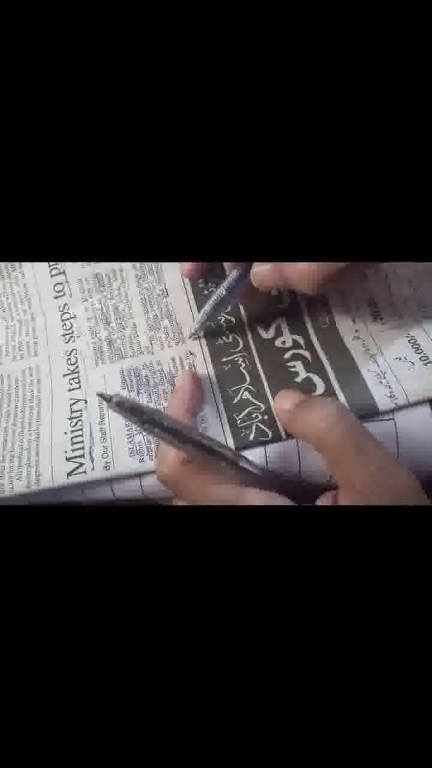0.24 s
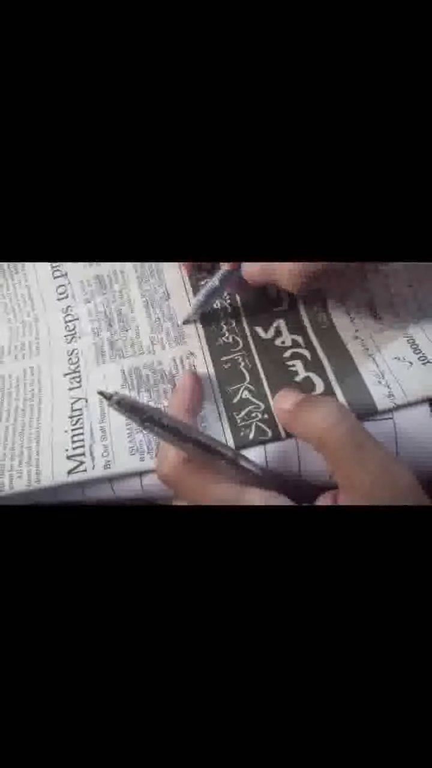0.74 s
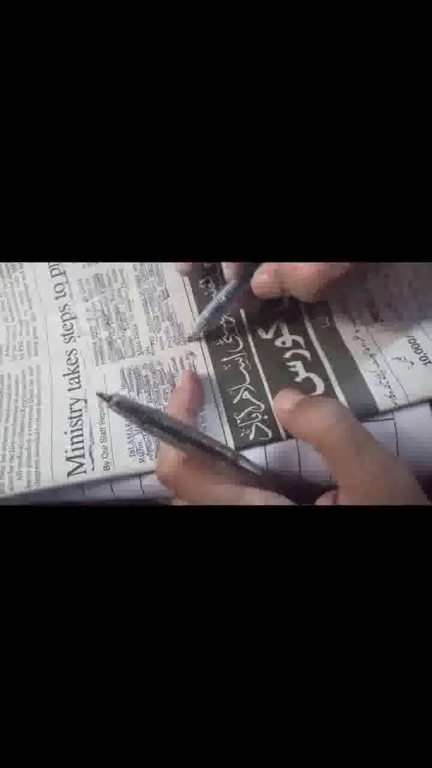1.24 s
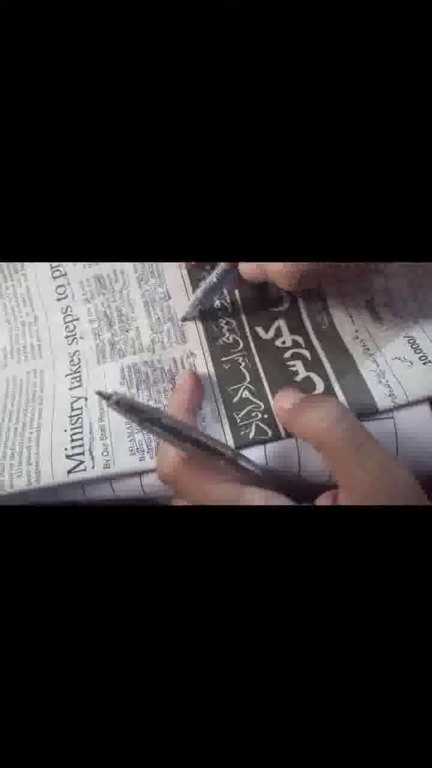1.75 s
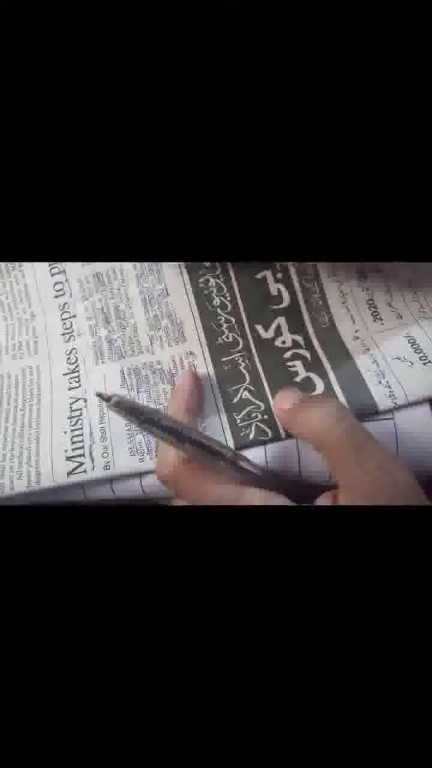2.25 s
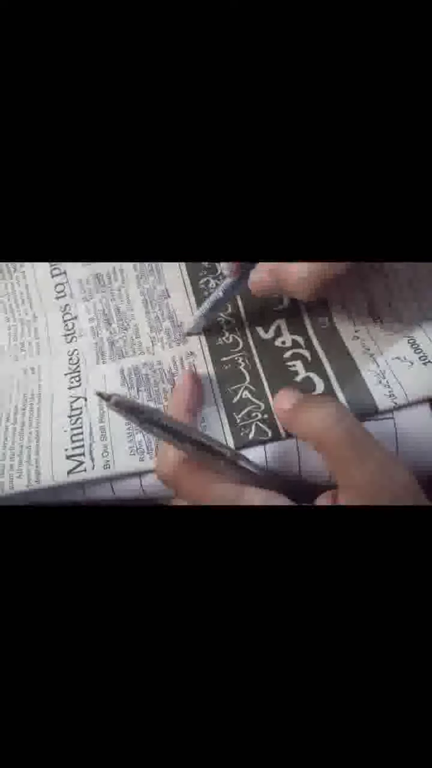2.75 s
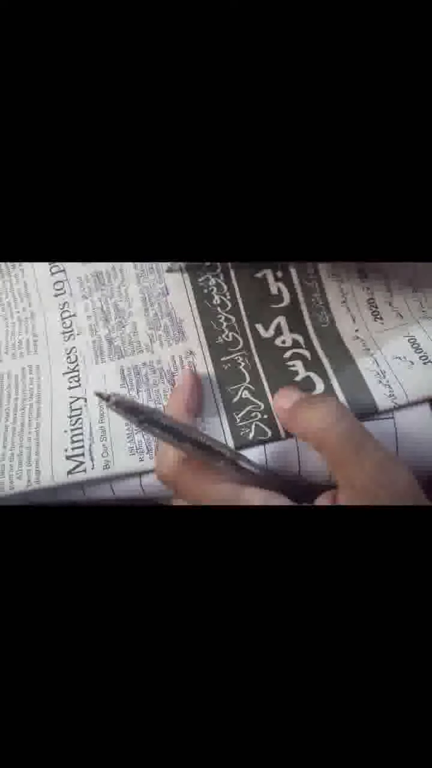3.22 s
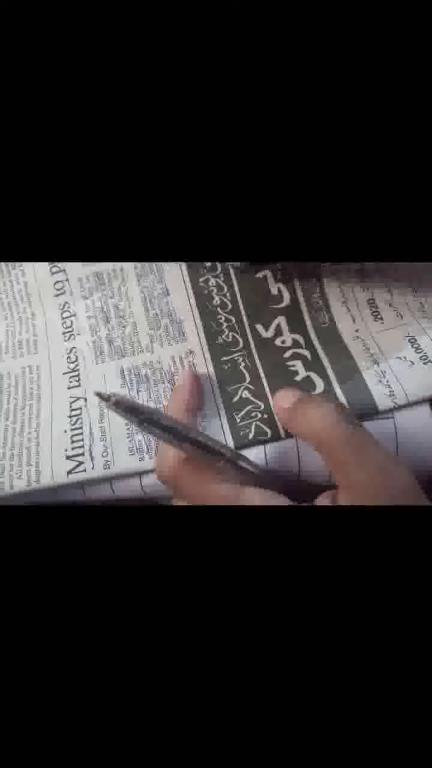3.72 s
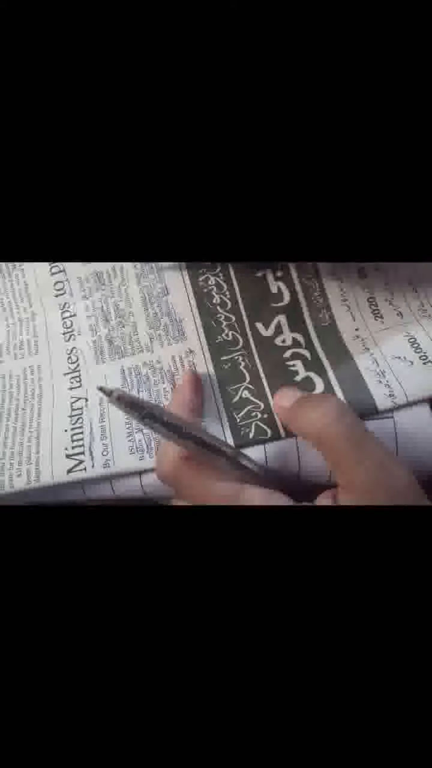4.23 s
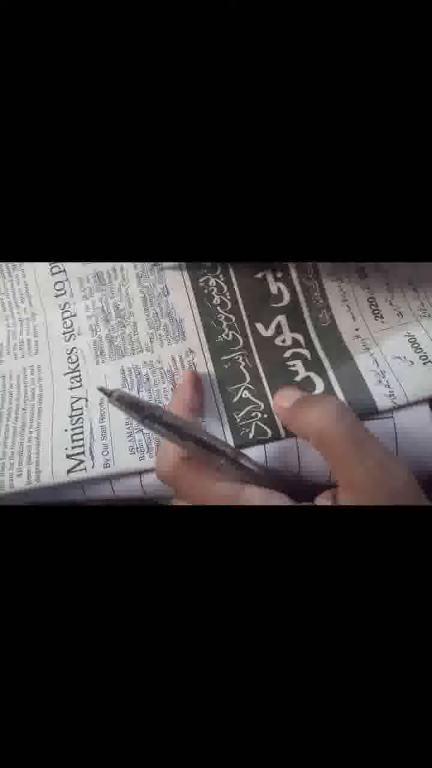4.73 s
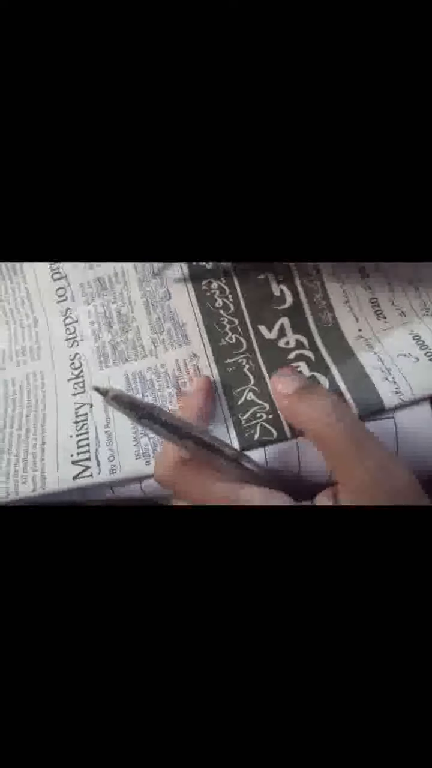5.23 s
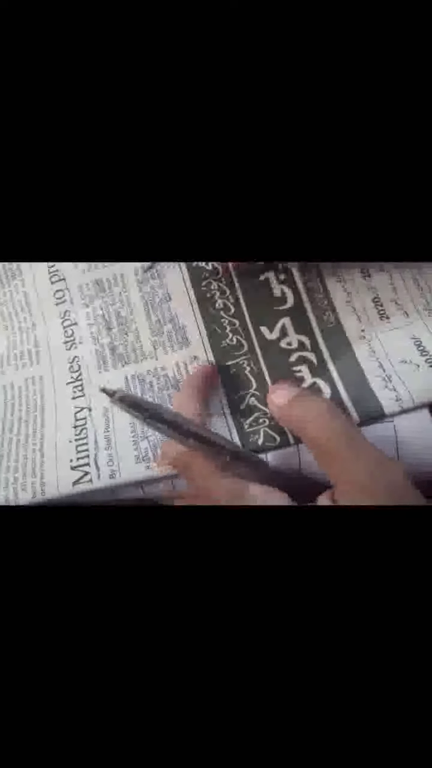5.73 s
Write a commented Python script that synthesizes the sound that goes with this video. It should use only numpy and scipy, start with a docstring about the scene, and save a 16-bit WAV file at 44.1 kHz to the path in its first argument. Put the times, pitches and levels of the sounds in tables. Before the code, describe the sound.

Close to a phone microphone, a flat hand sweeps loudly over newspaper resting on a notebook. Quiet, short pen strokes follow, with a few sharp clicking taps clustered midway. After a near lull, fingers rub the sheet with growing force until a crease pops brightly and the paper rustles loudly. The small quiet room adds only a faint reflection, with low desk rumble and soft hum.

```python
"""First a flat hand wipes broadly over newsprint; then a pen glides in short light strokes, with sharp taps.
Fingers rub the sheet ever more firmly until it crinkles and a crease pops, over a faint hum and rumble.
Strokes are random fibre slips shaped into hiss and flutter; taps are short blows ringing damped bands.
The newspaper lies on a notebook on a desk, close to a phone microphone in a quiet room."""
import sys
import numpy as np
from scipy import signal
from scipy.fft import rfft, irfft, next_fast_len
from scipy.io import wavfile
from scipy.ndimage import uniform_filter1d, minimum_filter1d, map_coordinates

SR = 44100
rng = np.random.default_rng(int(sys.argv[2]) if len(sys.argv) > 2 else 0)


def store_pcm(level_fs):
    """Save levels as 16-bit WAV."""
    pcm = np.round(np.clip(level_fs, -1, 1) * 32767).astype(np.int16)
    wavfile.write(sys.argv[1], SR, np.atleast_2d(pcm).T)


N = 263257  # length [samples]


def amp(db):
    """Decibels to gain."""
    return 10 ** (np.asarray(db) / 20)


def unit(x):
    """Scale to rms 1."""
    return x / np.sqrt(np.mean(x ** 2) + 1e-20)


def noise():
    """White noise as long as the scene."""
    return rng.standard_normal(N)


def along(points, hz):
    """(frequency [Hz], value) points read on a log frequency axis."""
    f, v = np.transpose(points)
    return np.interp(np.log(hz + 1), np.log(f + 1), v)


def curves(rows):
    """One value per sample for each column after the time."""
    s, *cols = np.transpose(rows)
    return [np.interp(np.arange(N) / SR, s, c) for c in cols]


def wobble(rate):
    """A smooth random curve with rate knots a second."""
    knots = rng.standard_normal(int(N * rate / SR) + 4)
    return map_coordinates(knots, [np.arange(N) * rate / SR])


def filtered(x, response):
    """Multiply the spectrum of x by a response of frequency."""
    n = x.shape[-1]
    m = next_fast_len(n + 8192)
    hz = np.fft.rfftfreq(m, 1 / SR)
    return irfft(rfft(x, m) * response(hz), m)[..., :n]


def equalised(x, points):
    """Filter x by a (frequency [Hz], gain [dB]) curve."""
    return filtered(x, lambda hz: amp(along(points, hz)))


def coloured(x, spectrum):
    """Shape x by a spectrum and scale it to rms 1."""
    return unit(equalised(x, spectrum))


def resonate(x, hz, q):
    """A damped resonance, made as a band-pass around hz that narrows as q grows."""
    half = 1 + 1 / (2 * max(q, .4))
    band = [hz / half, min(hz * half, .45 * SR)]
    return signal.sosfilt(signal.butter(2, band, "band", fs=SR, output="sos"), x)


def add(track, s, sound, db):
    """Place a short sound whose energy, averaged over 10 ms, has the level db."""
    start = max(round(s * SR), 0)
    piece = amp(db) * sound * np.sqrt(SR / 100 / np.sum(sound ** 2))
    track[start:start + len(piece)] += piece[:len(track[start:])]


def swells(rows, power):
    """One gain curve per dB column: speed follows a half sine, and loudness a power of that speed."""
    start, length, *levels_db = np.transpose(rows)
    energy = np.zeros((len(levels_db), N))
    for s, span, db in zip(start, length, np.transpose(levels_db)):
        i = np.arange(max(int(s * SR), 0), min(int((s + span) * SR), N))
        speed = np.abs(np.sin(np.pi * (i / SR - s) / span))
        energy[:, i] += (amp(db)[:, None] * speed ** power) ** 2
    return np.sqrt(energy)


def friction(spectrum, rate, grain_db, smooth, patchy_db):
    """Fibres catch and slip at random; the sheet's resonances drift as the contact moves."""
    caught = rng.random(N) < rate / SR  # rate in slips a second
    strength = rng.standard_normal(N) * amp(grain_db * np.clip(rng.standard_normal(N), -2, 2))
    z = signal.stft(unit(caught * strength) + smooth * noise(), nperseg=512)[2]
    # random patches of loud and soft, smoothed over frequency and then over time
    field = uniform_filter1d(rng.standard_normal(z.shape), size=4, axis=0)
    field = uniform_filter1d(field, size=18, axis=1)
    patchy = signal.istft(z * amp(patchy_db * unit(field)), nperseg=512)[1][:N]
    return coloured(patchy, spectrum)


# the flat hand wipes over the sheet, levels before the trims of each layer:
# (start [s], length [s], fibre hiss [dB], flutter of the sheet [dB], top sizzle [dB])
WIPE_STROKES = [(-0.03, 0.1, -47.5, -42, -55), (0.016, 0.03, -34.5, -32.5, -51),
                (0.068, 0.33, -41.5, -33.5, -62.5), (0.28, 0.19, -42, -46.5, -66),
                (0.447, 0.14, -31, -29, -56.5)]
# the pen glides lightly over the newsprint, level before trims: (start [s], length [s], fibre hiss [dB])
PEN_GLIDES = [(0.585, 0.12, -50), (0.696, 0.24, -57.5), (1.161, 0.14, -54), (1.25, 0.1, -57),
              (1.31, 0.22, -59), (1.49, 0.062, -61), (1.865, 0.107, -62), (2.027, 0.11, -54.5),
              (2.192, 0.13, -49), (2.284, 0.101, -44), (2.358, 0.17, -56.5), (2.504, 0.11, -50.5),
              (2.666, 0.13, -49.5), (2.872, 0.14, -52), (2.977, 0.067, -50), (3.146, 0.087, -48),
              (3.29, 0.1, -42), (3.677, 0.095, -51)]
# fingers rub and shift the sheet, levels before the trims of each layer:
# (start [s], length [s], fibre hiss [dB], flutter of the sheet [dB], top sizzle [dB])
FINGER_RUBS = [(1.548, 0.12, -50, -56, -73), (3.844, 0.22, -58, -59, -93), (4.024, 0.077, -61, -54, -94),
               (4.107, 0.12, -56.5, -60.5, -98), (4.211, 0.1, -57, -52.5, -92),
               (4.312, 0.129, -49, -48, -75), (4.412, 0.113, -57.5, -58.5, -100),
               (4.515, 0.12, -55.5, -54, -96), (4.729, 0.11, -48, -50, -80), (4.813, 0.11, -61.5, -55, -84),
               (4.886, 0.17, -41.5, -42.5, -59), (5.036, 0.097, -48, -51.5, -81),
               (5.09, 0.1, -52.5, -56.5, -84), (5.326, 0.06, -44.5, -47, -72),
               (5.364, 0.11, -43.5, -46.5, -79), (5.398, 0.218, -38.5, -33.5, -57),
               (5.554, 0.096, -44.5, -43.5, -60), (5.61, 0.19, -35.5, -38.5, -58.5),
               (5.762, 0.086, -36, -35.5, -99), (5.844, 0.066, -37, -32, -103),
               (5.856, 0.12, -43.5, -37.5, -70)]
# flutter of the sheet under a flat hand: (frequency [Hz], relative level [dB])
WIPE_SPECTRUM = [(100, -29.5), (380, -13), (560, -7.5), (800, 0), (1150, 7.5), (1700, 6), (2500, 2),
                 (3700, 1), (4600, -4.5), (6000, -14.5), (7400, -8.5), (8500, -14), (9500, -56.5)]
# flutter of the sheet under fingers and pen: (frequency [Hz], relative level [dB])
FLUTTER_SPECTRUM = [(100, -32.5), (250, -3), (480, -11), (720, -5), (850, -5.5), (1150, 7), (1450, 1),
                    (1750, 3), (2400, 1.5), (3500, -4), (4600, -11.5), (8000, -24), (9500, -76.5)]
# hiss of the sliding fibres: (frequency [Hz], relative level [dB])
FIBRE_SPECTRUM = [(1500, -28.5), (3000, -14.5), (4200, -7), (5100, -2), (6400, -1), (7400, -6.5),
                  (8300, -17.5), (8900, -27), (9500, -60.5)]
# thin top of the paper edge, also heard in top_octave: (frequency [Hz], level [dB])
EDGE_SPECTRUM = [(10000, -44.5), (11500, -3.5), (12500, 1), (15500, -2.5)]
PEN_FLUTTER_DB, PEN_SIZZLE_DB = -9.5, -32  # relative to its hiss: the light tip hardly shakes the sheet
PEN_POWER, RUB_POWER, WIPE_POWER = 2.0, 2.32, 1.07  # loudness grows as this power of the speed


def strokes():
    """Sliding makes the fibres hiss and shakes the sheet, more broadly under a flat hand."""
    pen, = swells(PEN_GLIDES, PEN_POWER)
    rub_hiss, rub_flutter, rub_sizzle = swells(FINGER_RUBS, RUB_POWER)
    wipe_hiss, wipe_flutter, wipe_sizzle = swells(WIPE_STROKES, WIPE_POWER)
    shake = rub_flutter + amp(PEN_FLUTTER_DB) * pen
    slide = rub_hiss + wipe_hiss + pen
    edge = amp(PEN_SIZZLE_DB) * pen + rub_sizzle + wipe_sizzle
    # the grip wavers slowly and quickly
    grip_db = 1.0 * wobble(45) + 1.2 * wobble(220)
    wipe = amp(-0.1) * wipe_flutter * friction(
        WIPE_SPECTRUM, rate=4300, grain_db=0, smooth=1.4, patchy_db=3.5)
    fingers = amp(0.26) * shake * friction(
        FLUTTER_SPECTRUM, rate=2200, grain_db=3.0, smooth=0.67, patchy_db=3.5)
    hiss = amp(-0.5) * slide * friction(
        FIBRE_SPECTRUM, rate=3700, grain_db=3.5, smooth=1.8, patchy_db=3.5)
    sizzle = edge * friction(
        EDGE_SPECTRUM, rate=1500, grain_db=0, smooth=0.54, patchy_db=4.0)
    return amp(grip_db) * (wipe + fingers + hiss + sizzle) + crinkles(shake + wipe_flutter)


def crinkles(shake):
    """Tiny buckles click at random, about 130 a second, as loud as the sheet is being shaken."""
    clicks = (rng.random(N) < 130 / SR) * rng.standard_normal(N)
    spectrum = [(300, -15), (900, 2.0), (3000, -1.5), (7500, 2), (9300, -41)]
    return amp(-19.5) * shake * coloured(clicks, spectrum)


def top_octave(x):
    """The thin spit of a paper edge."""
    return equalised(x, EDGE_SPECTRUM)


def contact(crush_db, crush_t60):
    """One sharp blow, then the paper layers crush as noise that falls by 60 dB in crush_t60 seconds."""
    t = np.arange(SR // 16) / SR
    blow = rng.standard_normal(len(t)) * amp(-60 * t / crush_t60) * (1 - np.exp(-t / 0.00087))
    blow *= amp(crush_db) / np.linalg.norm(blow)  # crush energy relative to the blow
    blow[0] += 1
    return blow


# the pen tip hits the pile, levels before trims and the paper's tone curve:
# (time [s], pile knock [Hz], knock level [dB], crack [Hz], crack level [dB],
#  tick [Hz], tick level [dB], crush relative to the blow, before trims [dB])
PEN_TAPS = [(0.6139, 970, -28, 2610, -39, 5940, -48.5, -1), (0.7063, 977, -25, 2510, -29, 5220, -28, -3),
            (2.4703, 927, -39, 2213, -32, 4630, -30.5, -2.5),
            (3.2795, 1209, -24, 2550, -11, 5730, -16, -10.5),
            (3.304, 1212, -43, 2600, -33.5, 5410, -42.5, 12),
            (3.3999, 1130, -25, 2520, -22, 6250, -16.5, 3.5),
            (3.4933, 938, -34.5, 2680, -17.5, 5500, -18.5, -4.5),
            (3.514, 1140, -48.5, 2610, -33.5, 5470, -43, 1),
            (3.7716, 1344, -27.5, 2640, -25, 5830, -25, -4), (3.835, 1277, -38.5, 2970, -26, 4950, -15, 9),
            (3.8712, 975, -28, 2434, -18, 6200, -14.5, 6), (5.963, 1140, -55, 2290, -38, 5870, -47, 10)]
# soft, padded touches that only knock the pile, before the paper's tone curve:
# (time [s], pile knock [Hz], knock level [dB])
SOFT_TOUCHES = [(0.2365, 960, -38.5), (2.819, 1230, -58.5), (3.1145, 1200, -44), (3.379, 970, -47),
                (3.475, 950, -45), (3.62, 1204, -52)]
DESK_HZ, DESK_DB = 179.7, -29  # the desk's dull thump under a blow, level relative to the knock


def taps():
    """Each blow rings the damped pile, cracks the top sheet and ticks at the tip; touches ring the pile."""
    out, sparkle = np.zeros(N), np.zeros(N)
    for s, knock_hz, knock_db, crack_hz, crack_db, tick_hz, tick_db, crush_db in PEN_TAPS:
        knock = contact(crush_db - 7.5, crush_t60=0.047)
        add(out, s - .0005, resonate(knock, knock_hz, q=2.73), knock_db)
        # the whole notebook rings a little longer under the knock
        notebook = contact(crush_db - 7, crush_t60=0.032)
        add(out, s, resonate(notebook, 870, q=12.0), knock_db - 16.5)
        blow = contact(crush_db, crush_t60=0.016)
        add(out, s, resonate(blow, crack_hz, q=1.76), crack_db + .3)
        add(out, s, resonate(blow, tick_hz, q=2.14), tick_db + 0.54)
        # the blow also pushes through to the desk
        add(out, s, resonate(blow, 460, q=0.39), crack_db - 30.5)
        add(out, s, resonate(blow, DESK_HZ, q=2.1), knock_db + DESK_DB)
        # the top octave fades steeply as the tick gets weaker
        add(sparkle, s, blow, -34.5 + 5 * min(tick_db + 14.5, 0))
    for s, knock_hz, knock_db in SOFT_TOUCHES:
        touch = contact(crush_db=2, crush_t60=0.016)
        add(out, s - .0005, resonate(touch, knock_hz, q=2.2), knock_db)
    # the lows come forward while soft paper swallows the highest treble
    paper_tone = [(650, 7), (7800, -4.5), (8800, -16.0), (10000, -19), (15000, -16.0)]
    return top_octave(sparkle) + equalised(out, paper_tone)


# small nudges of the sheet, crinkle before its treble cut: (time [s], thud level [dB], crinkle level [dB])
SHEET_NUDGES = [(0.235, -51, -54), (1.58, -69.5, -59), (2.472, -46, -70), (3.099, -63.5, -57),
                (3.228, -68, -54), (3.66, -53, -61.5), (4.026, -73, -55), (4.251, -81, -57),
                (4.337, -77, -58), (4.364, -82, -50.5), (4.496, -63, -59.5), (4.56, -85, -58),
                (4.675, -74, -66.5), (4.723, -72, -59), (4.861, -75, -53), (4.901, -56, -69),
                (4.921, -71, -44), (5.35, -52, -52), (5.375, -44, -49), (5.862, -65, -35)]


def nudges():
    """A finger shoves the sheet: a dull thud and a tiny crinkle."""
    thuds, crackle = np.zeros(N), np.zeros(N)
    for s, thud_db, crinkle_db in SHEET_NUDGES:
        add(thuds, s, resonate(contact(crush_db=-1, crush_t60=.04), 300, q=0.92), thud_db)
        add(crackle, s, resonate(contact(crush_db=11, crush_t60=0.013), 4000, q=0.52), crinkle_db)
    return thuds + equalised(crackle, [(7800, 1.0), (9500, -35)])


# a crease pops as the sheet is shifted: (time [s], level [dB], pitch of the pop [Hz])
CREASE_POPS = [(5.5258, -28.5, 5740), (5.53, -23.5, 5240), (5.533, -23, 5180)]


def crease():
    """A fold flips over in a few quick, bright pops."""
    pops, spit = np.zeros(N), np.zeros(N)
    for s, db, hz in CREASE_POPS:
        pop = contact(crush_db=33, crush_t60=0.017)
        add(pops, s, resonate(pop, hz, q=1.3), db)
        add(spit, s, pop, db - 6.0)
    return pops + top_octave(spit)


# soft scuffs of the hand on the pile:
# (time [s], level before trim and envelope [dB], pile pitch [Hz], time scale of the envelope [s])
HAND_SCUFFS = [(0.232, -31.5, 530, 0.012), (1.574, -49.5, 965, 0.06), (2.97, -50, 1120, 0.031),
               (3.098, -53, 1110, 0.056), (4.688, -56, 1190, 0.022), (4.971, -39, 774, 0.022),
               (5.792, -32, 1230, 0.029)]


def scuffs():
    """Skin drags briefly over the pile and makes it sound at its knock pitch."""
    out = np.zeros(N)
    for s, db, hz, length in HAND_SCUFFS:
        u = np.arange(SR // 5) / SR / length
        drag = resonate(rng.standard_normal(len(u)), hz, q=2.3)
        envelope = 3 * u * np.exp(-3 * u)  # peaks a third of the way into length
        start = round(s * SR)
        out[start:start + len(u)] += (amp(db + 6.5) * unit(drag) * envelope)[:N - start]
    return out


# decay of the room: (frequency [Hz], time to fall by 60 dB [s])
ROOM_DECAY = [(200, 0.41), (1000, 0.21), (3000, 0.22), (8000, 0.19), (14000, 0.081)]


def room(x):
    """The walls answer after a 5 ms gap, each frequency dying at its own speed."""
    hz, t, z = signal.stft(rng.standard_normal(SR // 2), SR, nperseg=256)
    decay = amp(-60 * t / along(ROOM_DECAY, hz)[:, None])
    tail = signal.istft(z * decay, SR, nperseg=256)[1]
    answer = np.pad(tail / np.linalg.norm(tail), (SR // 200, 0))
    return signal.fftconvolve(x, answer)[:N]


# desk rumble under the hands, before trim and sway: (time [s], level [dB])
RUMBLE_CURVE = [(0, -47), (0.1, -63), (0.65, -59.5), (1, -63), (2.9, -61.0), (3.35, -57.0), (3.9, -63),
                (4.15, -64.5), (4.75, -67), (4.95, -49.5), (5.1, -56.0), (5.45, -48.5), (5.97, -50)]
# colour of the desk rumble: (frequency [Hz], relative level [dB])
RUMBLE_SPECTRUM = [(20, -19), (45, -6), (90, -1), (150, 0), (210, -11.5), (350, -21), (600, -36),
                   (1500, -64.5)]
# a low hum that swells and fades, before trim and sway: (time [s], level [dB])
HUM_CURVE = [(0, -63), (1.65, -66), (1.82, -53.5), (2.3, -62.0), (2.7, -54), (3.05, -70.5), (3.4, -57.5),
             (3.8, -77), (4.7, -71), (5.25, -59), (5.97, -65)]
# colour of the air noise: (frequency [Hz], relative level [dB])
AIR_SPECTRUM = [(100, 6.5), (400, 6.5), (900, 9), (1700, 4), (5000, 0), (8000, -5.5), (10000, -13.5),
                (15500, -4.5)]
RUMBLE_SWAY_DB = 1.5  # scale of the random sway


def background():
    """Noise rumbles in the desk, a sine hums with wavering pitch and level, and air noise stays steady."""
    rumble_db = curves(RUMBLE_CURVE)[0] + 1.5 + RUMBLE_SWAY_DB * wobble(15)
    rumble = amp(rumble_db) * coloured(noise(), RUMBLE_SPECTRUM)
    hum_db = curves(HUM_CURVE)[0] + 1.3 + wobble(2.4)
    hum_hz = 102.3 + 2.2 * wobble(8.8)
    hum = amp(hum_db) * unit(np.sin(2 * np.pi * np.cumsum(hum_hz) / SR))
    return rumble + hum + amp(-71.0) * coloured(noise(), AIR_SPECTRUM)


# the part that the two channels do not share: (frequency [Hz], side level before the width offset [dB])
SIDE_CURVE = [(100, -32.5), (300, -29), (700, -40.5), (3000, -41.5), (5500, -27), (8000, -21), (14000, -15)]


def spread(x, width_db, size):
    """Nearly mono: only a faint part, scattered over size samples, differs between the channels."""
    scatter = rng.standard_normal(size)
    side = signal.fftconvolve(x, scatter / np.linalg.norm(scatter))[:N]
    side = amp(width_db) * equalised(side, SIDE_CURVE)
    return np.array([x + side, x - side])


def scene():
    """Paper and pen close by, the room faintly behind them."""
    hits = taps()
    rustle = strokes() + nudges() + crease() + scuffs()
    hits = spread(hits + amp(-19) * room(hits), width_db=7.5, size=SR // 150)
    rustle = spread(rustle + amp(-17.0) * room(rustle), width_db=-1.0, size=SR // 150)
    return hits + rustle + spread(background(), width_db=8.5, size=SR // 4)


# the phone's own colour, with a narrow dip: (frequency [Hz], gain [dB])
PHONE_COLOUR = [(1500, -2.5), (1700, -8), (1900, -0.5)]
TOP_HZ = 16100  # band limit


def record(dry):
    """The phone colours the sound, limits its peaks to full scale, then cuts steeply at its band limit."""
    heard = equalised(dry, PHONE_COLOUR)
    needed = 1 / np.maximum(np.abs(heard).max(axis=0), 1)
    # hold the lowest gain around each peak, then smooth it
    gain = uniform_filter1d(minimum_filter1d(needed, size=129), size=65)
    return filtered(heard * gain, lambda hz: 1 / (1 + (hz / TOP_HZ) ** 120))


dry = scene()
out = record(dry)
store_pcm(out)
```